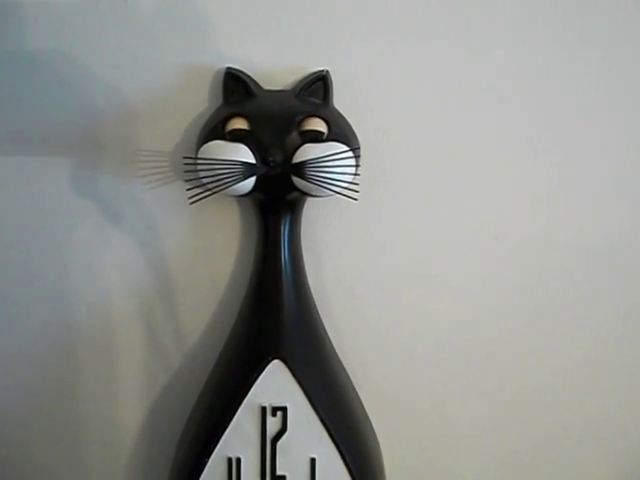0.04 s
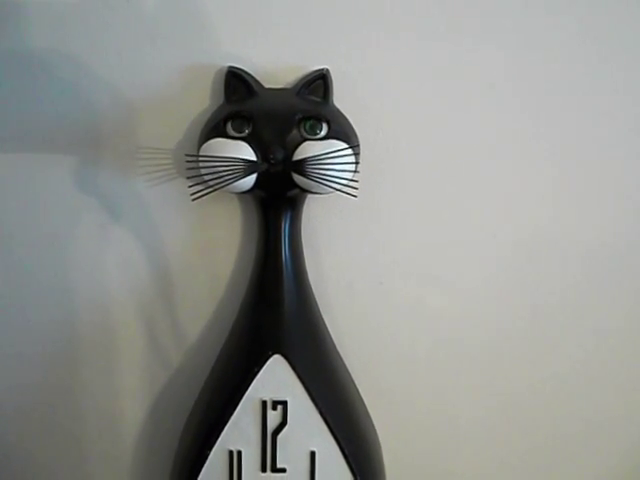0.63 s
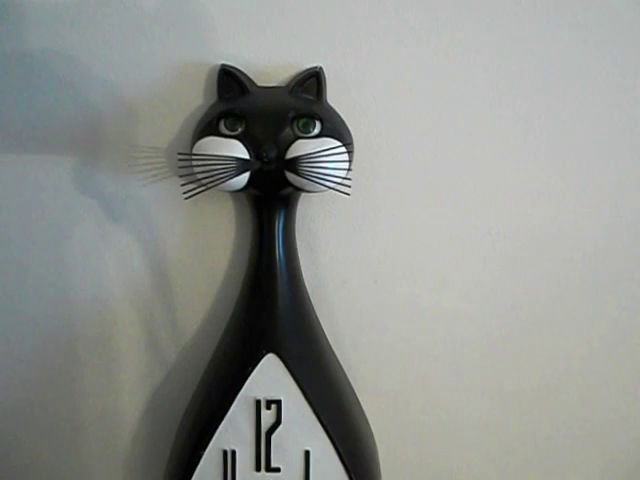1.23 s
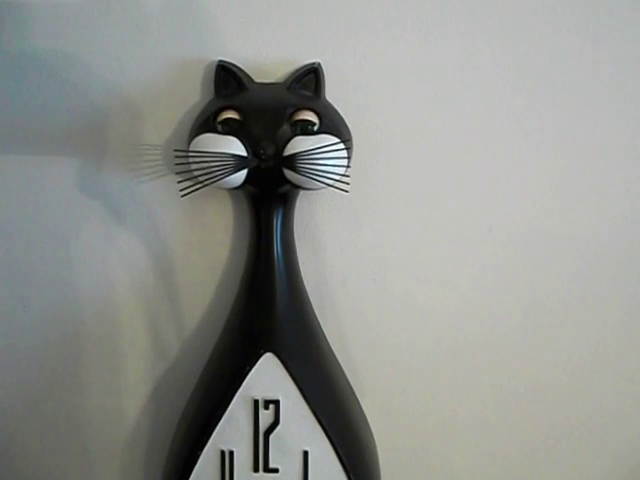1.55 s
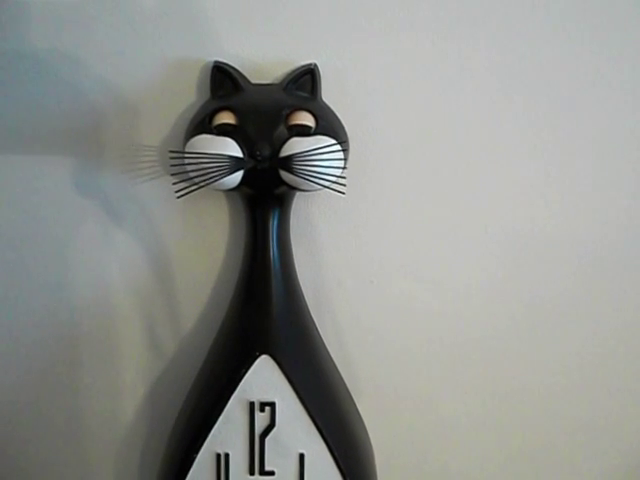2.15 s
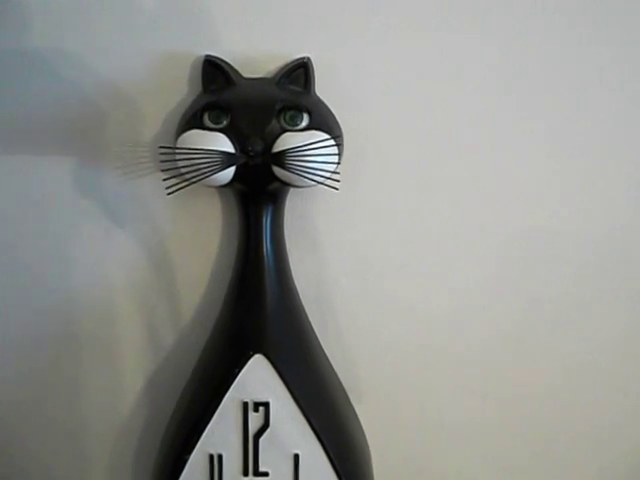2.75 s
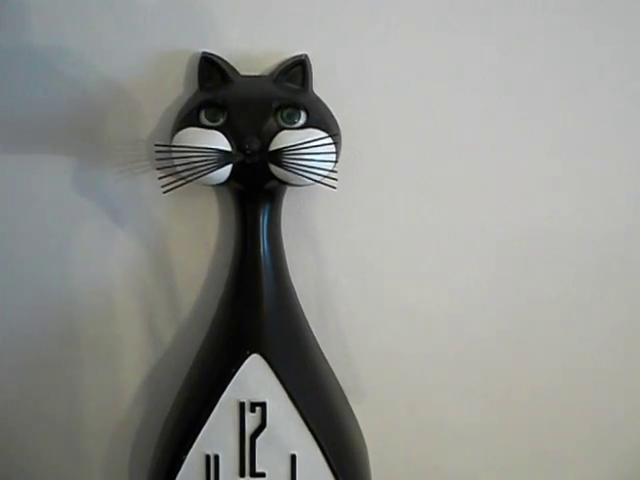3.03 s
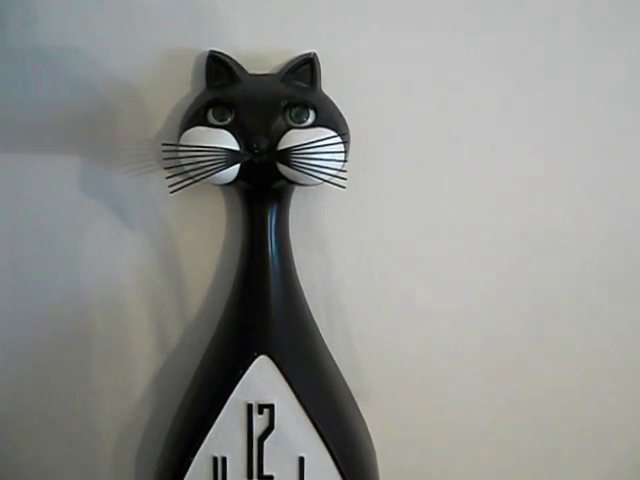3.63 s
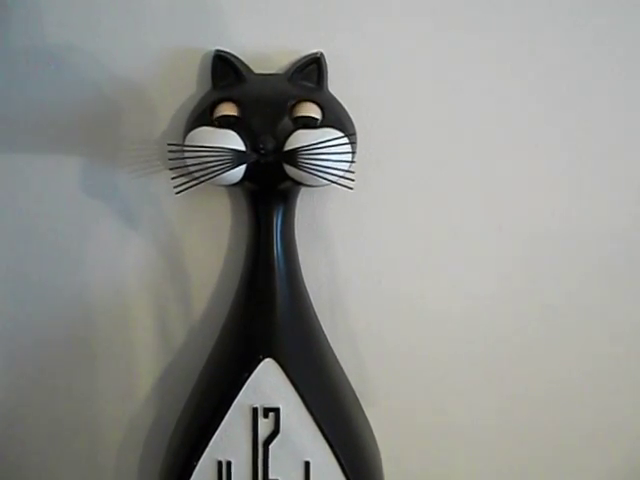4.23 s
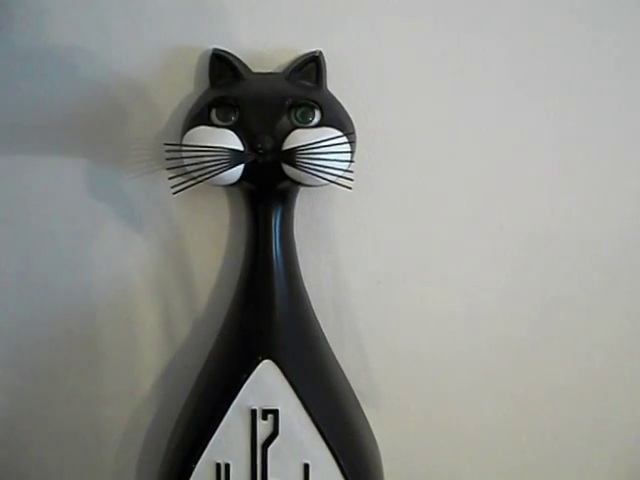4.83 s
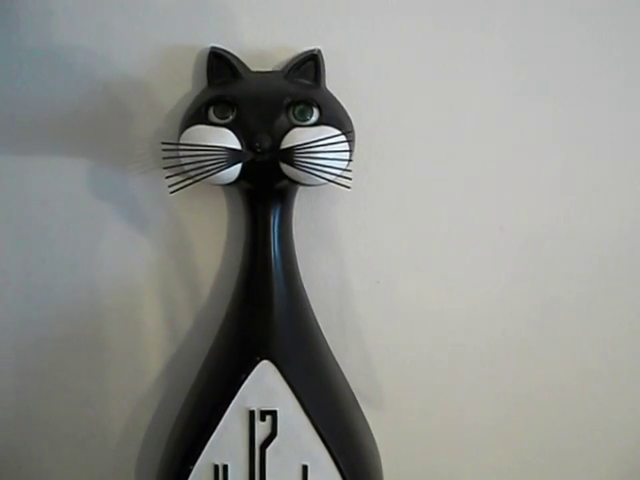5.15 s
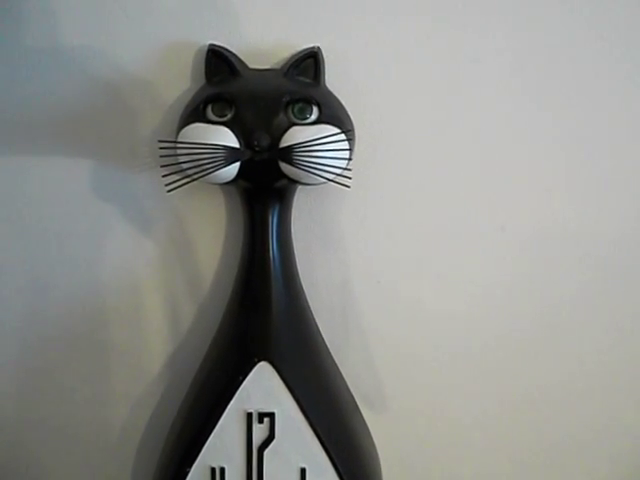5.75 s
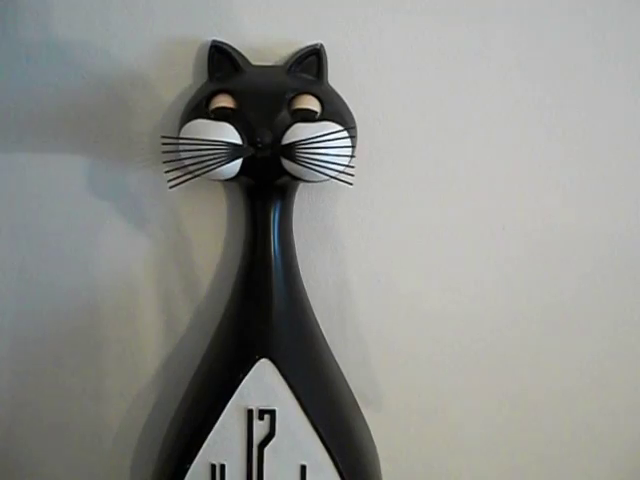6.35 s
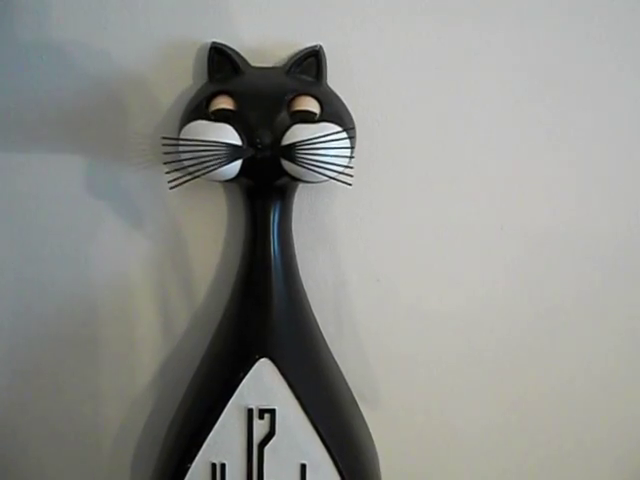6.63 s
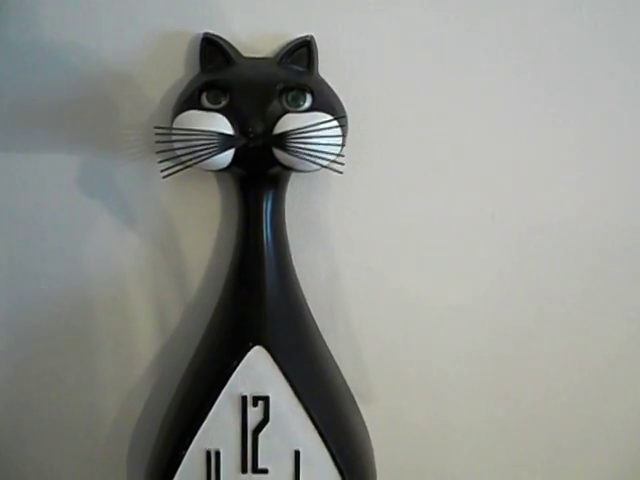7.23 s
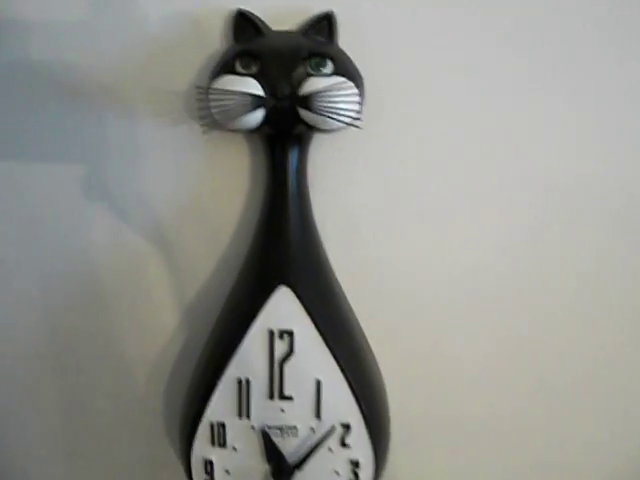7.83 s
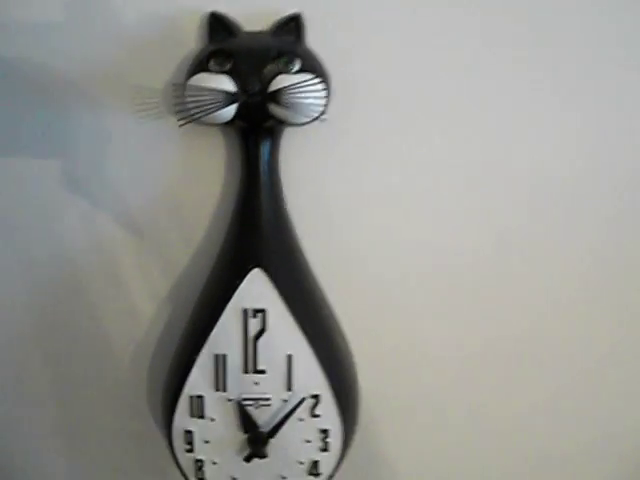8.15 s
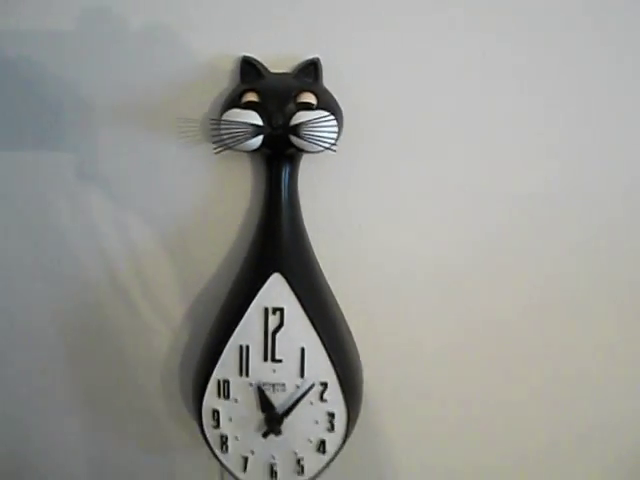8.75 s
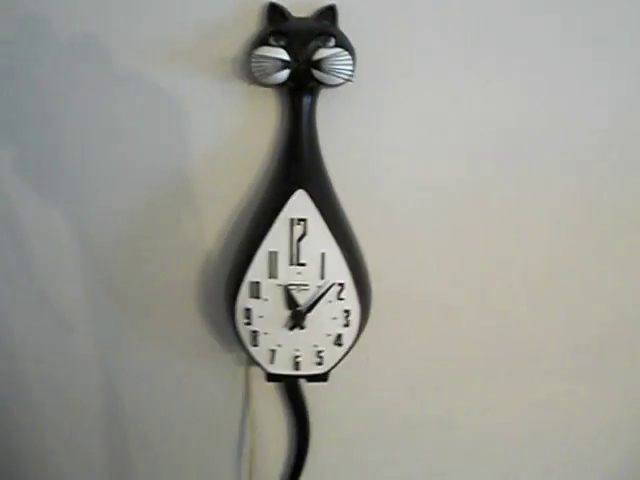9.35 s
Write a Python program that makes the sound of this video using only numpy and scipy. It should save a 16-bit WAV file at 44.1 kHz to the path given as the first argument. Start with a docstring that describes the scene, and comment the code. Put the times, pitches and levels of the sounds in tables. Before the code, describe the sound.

An electric wall clock hums and whirrs steadily with faint periodic ticks, then a sharp snap and soft handling noises near the end.

```python
"""Electric cat clock, close up

A cat-shaped wall clock in a quiet room, on a hand-held mono microphone. Mains hum beats against a motor
turning just under mains speed; gears whirr in the plastic case and the linkage of the rolling eyes ticks
once a swing, over low rumble and a faintly buzzing hiss. Near the end the microphone backs away,
with one sharp snap, a swish of clothing and a few soft knocks."""
import sys
import numpy as np
from scipy import signal
from scipy.fft import rfft, irfft, next_fast_len
from scipy.io import wavfile

SR = 44100
rng = np.random.default_rng(int(sys.argv[2]) if len(sys.argv) > 2 else 0)


def to_wav(s):
    """Save 16-bit WAV."""
    ch = np.atleast_2d(s).T  # columns
    pcm = np.round(np.clip(ch, -1, 1) * 32767)  # PCM
    wavfile.write(sys.argv[1], SR, pcm.astype(np.int16))


N = 418509
MAINS_HZ = 60


def mains_hum(retreat, far_db, waver_db):
    """Magnetic hum: the motor's iron is pulled twice in each mains cycle."""
    # multiple of the mains, rms level close up/dB
    orders = [(2, -27), (6, -53), (8, -79)]
    turns = MAINS_HZ * np.arange(N) / SR
    hum = sum(from_db(level_db) * tone(turns, multiple) for multiple, level_db in orders)
    return hum * from_db(far_db * retreat + waver_db * drift(4.4))


def rotor(retreat, speed_hz, wander_hz, waver_db):
    """The rotor slips behind the mains, so its second order beats slowly against the hum."""
    # motor vibration: multiple of the speed, rms level close up/dB, change at the far spot/dB
    orders = [(1, -59.5, 0), (2, -52, 4), (4, -49.5, -6.5), (5, -49, -2.5), (7, -52.5, 8.5), (9, -78, 1),
              (11, -67.5, 4.5), (12, -67, -0.5), (13, -72.5, 0), (14, -78, 2.5)]
    turns = np.cumsum(speed_hz + wander_hz * drift(1)) / SR
    return sum(from_db(level_db + far_db * retreat + waver_db * drift(3.7)) * tone(turns, multiple)
               for multiple, level_db, far_db in orders)


def gears(load_shares, grain_db):
    """Rubbing teeth excite the case, harder under load; each resonance follows it by its own share."""
    # wheels that bind a little once a turn: turn/s, tightest at t/s, load swing/dB
    wheels = [(3.6, 1.62, 0.9), (2.0, 1.5, 1.4)]
    # gear noise in the case: f/Hz, width/Hz, level/dB per Hz
    modes = [(606, 85, -83.5), (816, 130, -88.5), (1436, 110, -95), (2000, 180, -99.5), (2260, 360, -101)]
    t = np.arange(N) / SR
    load_db = sum(swing_db * np.cos(2 * np.pi * (t - tight_s) / turn_s)
                  for turn_s, tight_s, swing_db in wheels)
    teeth_db = grain_db * drift(30)
    return sum(resonance(white() * from_db(level_db + share * load_db + teeth_db), hz, width)
               for (hz, width, level_db), share in zip(modes, load_shares))


def swing_contacts(first_s, swing_s):
    """Times and levels of the contacts that come round with every swing of the eyes."""
    # stop, rebound and two light touches: t into the swing/s, relative level/dB
    contacts = [(0, -33), (.034, -40.5), (.542, -43), (1.42, -42)]
    starts = np.arange(first_s, N / SR, swing_s)
    rows = [(start + s, level_db) for start in starts for s, level_db in contacts if start + s < N / SR]
    return np.transpose(rows)


def linkage(touch_db, seat_db, seat_s, dulling, scatter_db):
    """The lever touches, then seats; both contacts ring the hollow case, light ticks more dully."""
    # plastic case: f/Hz, relative level/dB, t60/s
    modes = [(900, -9, .025), (1200, -6, 0.035), (1440, -8, 0.039), (1980, -3, 0.014), (2287, -4, 0.016),
             (2720, -4, 0.0035)]
    times, level_db = swing_contacts(first_s=0.3256, swing_s=2.2413)
    lightness_db = level_db.max() - level_db
    out = np.zeros(N)
    for k, (hz, mode_db, t60) in enumerate(modes):
        octaves_up = np.log2(hz / modes[0][0])
        strength_db = level_db + mode_db - dulling * lightness_db * octaves_up
        strength_db += scatter_db * rng.standard_normal(len(times))
        touch = clicks_at(times, strength_db + touch_db)
        seat = clicks_at(times + seat_s, strength_db + seat_db)
        out += (-1) ** k * ring(touch + seat, hz, t60)
    return out


def snap(bass_cut_hz):
    """Hard, very short contacts right at the microphone; its small housing gives no bass."""
    # the housing snaps in the hand: t/s, relative level/dB
    snaps = [(7.627, -46), (7.6399, -17.5), (7.6409, -41)]
    # housing: f/Hz, relative level/dB, t60/s
    modes = [(1440, -9, 0.0092), (1900, -15, 0.016), (2340, -10, 0.02), (2980, -10.5, 0.0088),
             (3970, -20, 0.01), (5000, -15, 0.0082), (6390, -4, 0.0064), (7520, -6, 0.005)]
    contacts = clicks_at(*np.transpose(snaps))
    rings = sum((-1) ** k * from_db(mode_db) * ring(contacts, hz, t60)
                for k, (hz, mode_db, t60) in enumerate(modes))
    return signal.sosfilt(signal.butter(6, bass_cut_hz, "high", fs=SR, output="sos"), rings)


def finger_clicks():
    """Small bright clicks as the grip on the microphone shifts."""
    # contacts under the fingers: t/s, relative level/dB
    clicks = [(8.2053, -45), (8.3880, -45), (8.3970, -37), (8.4800, -46)]
    # their ringing: f/Hz, relative level/dB, t60/s
    modes = [(2950, 0.5, 0.01), (3670, -5.5, .009), (6440, -4.5, 0.0039)]
    edges = np.diff(clicks_at(*np.transpose(clicks)), prepend=0)
    # The edges give each ring an abrupt start; the divisor cancels their treble lift.
    return sum(from_db(mode_db) * ring(edges, hz, t60) / (2 * np.sin(np.pi * hz / SR))
               for hz, mode_db, t60 in modes)


def knocks(t60_at_500_hz, lengthening, soft_hz):
    """Moving about: damped bursts, each in its own band; the deeper, the longer. Soft contact dulls them."""
    # t/s, relative level/dB, low edge/Hz, high edge/Hz
    bumps = [(7.259, -44.5, 597, 1600), (7.732, -41.5, 1510, 3000), (7.970, -42.5, 423, 2800),
             (9.107, -38.5, 280, 1460), (9.126, -35.5, 238, 550)]
    soft = signal.butter(1, soft_hz, fs=SR, output="sos")
    out = np.zeros(N + SR)
    for s, level_db, low_hz, high_hz in bumps:
        blow = dying_noise(t60_at_500_hz * (500 / low_hz) ** lengthening)
        band = signal.butter(3, [low_hz, high_hz], "band", fs=SR, output="sos")
        burst = signal.sosfilt(np.vstack([band, soft]), blow)
        start = round(s * SR)
        out[start:start + len(burst)] += from_db(level_db) * burst * blow.std() / burst.std()
    return out[:N]


def swish(grain_db):
    """Cloth slides over cloth on the step back, catching slightly; each brush swells and fades."""
    # rubbing cloth: f/Hz, relative level/dB
    spectrum = [(500, -21), (1000, 5), (1500, 1), (2100, 3), (2800, -3), (3600, -11), (8000, -29)]
    # middle t/s, level/dB, half length/s
    brushes = [(8.775, -56, 0.1), (8.99, -62, .04)]
    t, rub = np.arange(N) / SR, coloured(spectrum)
    strokes = sum(from_db(level_db) * np.exp(-((t - s) / half_s) ** 2) for s, level_db, half_s in brushes)
    return rub / rub.std() * strokes * from_db(grain_db * drift(60))


def rumble():
    """The steady low tone of the room."""
    # f/Hz, level/dB per Hz
    spectrum = [(8, -58.5), (20, -59), (42, -66), (62, -57), (85, -62), (115, -64.5), (140, -68.5),
                (185, -69), (260, -74.5), (350, -79.5), (480, -84.5), (1100, -94), (3000, -106),
                (8000, -120)]
    return coloured(spectrum)


def hiss(buzz_depth):
    """The hiss flutters four times in each mains cycle, a fine buzz."""
    # f/Hz, level/dB per Hz
    spectrum = [(300, -104), (2500, -99.5), (5000, -99), (7300, -99), (8000, -105), (8600, -116)]
    flutter = np.cos(2 * np.pi * 4 * MAINS_HZ * np.arange(N) / SR)
    power = (1 + buzz_depth * flutter) ** 2
    return coloured(spectrum) * np.sqrt(power / power.mean())


def with_room(x, wet_db, t60):
    """Direct sound and the room's short diffuse tail."""
    tail = dying_noise(t60)
    return x + from_db(wet_db) * signal.fftconvolve(x, tail / np.linalg.norm(tail))[:N]


def from_db(db):
    """Decibels to gain."""
    return 10 ** (np.asarray(db) / 20)


def drift(rate_hz):
    """A smooth random wander with spread 1."""
    hop, settle = 100, 2000
    r = np.exp(-2 * np.pi * hop * rate_hz / SR)
    slow = signal.lfilter([1], [1, -2 * r, r * r], rng.standard_normal(N // hop + settle + 2))[settle:]
    return np.interp(np.arange(N) / hop, np.arange(len(slow)), slow / slow.std())


def tone(turns, multiple):
    """One harmonic of a rotation, rms 1, at a random phase."""
    return np.sqrt(2) * np.sin(2 * np.pi * (multiple * turns + rng.random()))


def white():
    """Noise of 0 dB per Hz."""
    return rng.standard_normal(N) * np.sqrt(SR / 2)


def coloured(spectrum):
    """Noise shaped by rows of f/Hz, level/dB per Hz."""
    hz, level_db = np.transpose(spectrum)
    size = next_fast_len(N)
    bins = np.maximum(np.fft.rfftfreq(size, 1 / SR), 1)
    gain = from_db(np.interp(np.log(bins), np.log(hz), level_db))
    return irfft(rfft(white(), size) * gain, size)[:N]


def dying_noise(t60):
    """A quarter of a second of noise that dies away."""
    t = np.arange(SR // 4) / SR
    return rng.standard_normal(len(t)) * np.exp(-np.log(1000) * t / t60)


def resonance(x, hz, width):
    """A band-pass with gain 1 at its top."""
    r, w = np.exp(-np.pi * width / SR), 2 * np.pi * hz / SR
    return signal.lfilter(np.array([1, 0, -1]) * (1 - r * r) / 2, [1, -2 * r * np.cos(w), r * r], x)


def ring(clicks, hz, t60):
    """A unit click sets a sine of height 1 ringing."""
    r, w = np.exp(-np.log(1000) / (t60 * SR)), 2 * np.pi * hz / SR
    return signal.lfilter([0, np.sin(w)], [1, -2 * r * np.cos(w), r * r], clicks + 1e-18)


def clicks_at(times, level_db):
    """One impulse for each contact."""
    out = np.zeros(N)
    out[np.round(times * SR).astype(int)] = from_db(level_db)
    return out


def scene():
    """The clock from close by, then a step back, with handling noise and room tone, in mono."""
    # the microphone's way through the room's standing waves: t/s, distance (0 near, 1 far)
    mic_path = [(0, 0.21), (7.7, 0.026), (8.1, 0.47), (8.7, 0.46), (9.25, 0.87), (9.49, 0.91)]
    retreat = np.interp(np.arange(N) / SR, *np.transpose(mic_path))
    hum = mains_hum(retreat, far_db=-1.2, waver_db=0.17)
    motor = rotor(retreat, speed_hz=58.78, wander_hz=0.015, waver_db=0.74)
    whirr = gears(load_shares=[0.73, 0.9, 1.5, 0.9, 0.51], grain_db=2.5)
    lever = linkage(touch_db=-12.5, seat_db=-6.5, seat_s=0.00218, dulling=0.4, scatter_db=1.9)
    ticks = with_room(lever * from_db(-5 * retreat), wet_db=-7, t60=0.1)  # 5 dB down at the far spot
    handling = with_room(snap(bass_cut_hz=930) + finger_clicks(), wet_db=-20, t60=0.072)
    movement = knocks(t60_at_500_hz=0.052, lengthening=0.79, soft_hz=700) + swish(grain_db=2.0)
    room_tone = rumble() + hiss(buzz_depth=0.24)
    return (hum + motor + whirr + ticks + handling + movement + room_tone)[None]


def record(dry):
    """The treble is cut steeply above 8750 Hz."""
    return signal.sosfilt(signal.ellip(12, 0.1, 80, 8750, fs=SR, output="sos"), dry)


dry = scene()
out = record(dry)
to_wav(out)
```